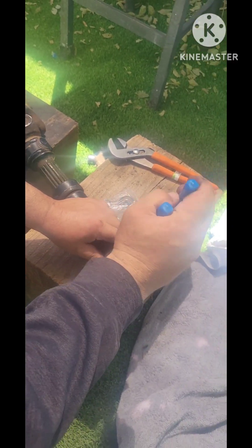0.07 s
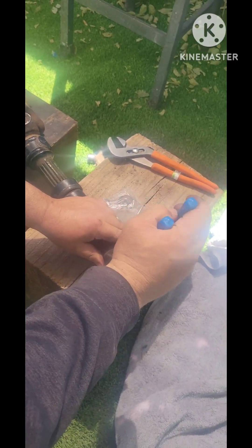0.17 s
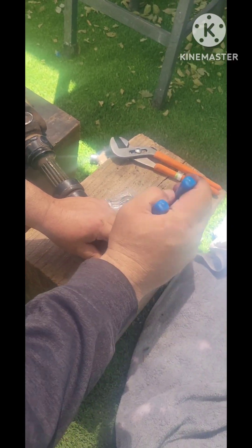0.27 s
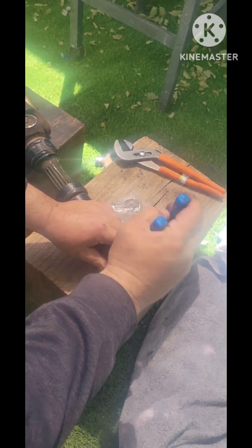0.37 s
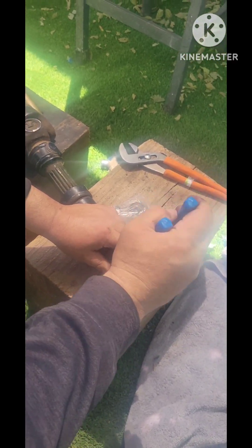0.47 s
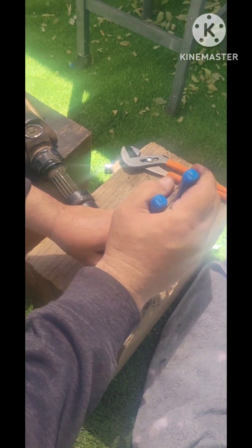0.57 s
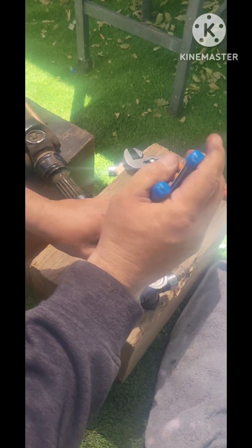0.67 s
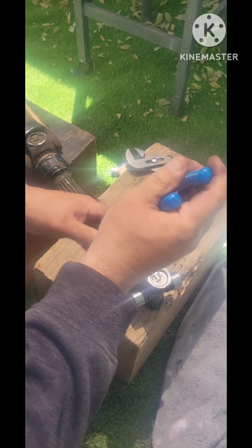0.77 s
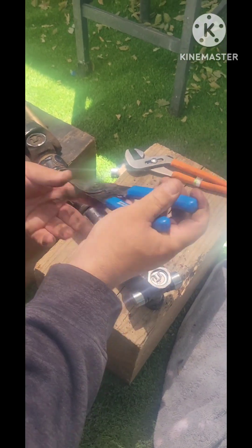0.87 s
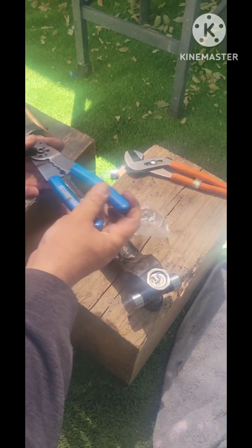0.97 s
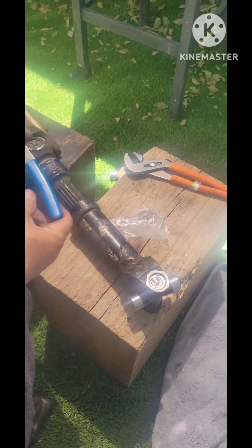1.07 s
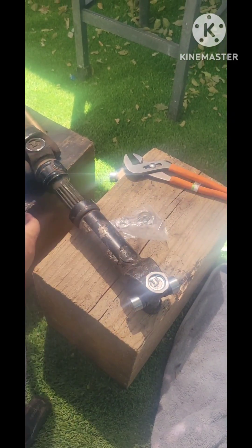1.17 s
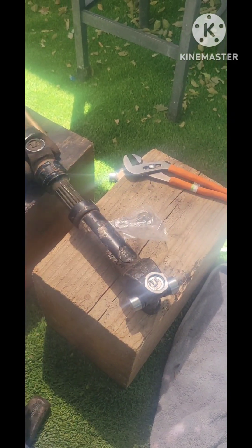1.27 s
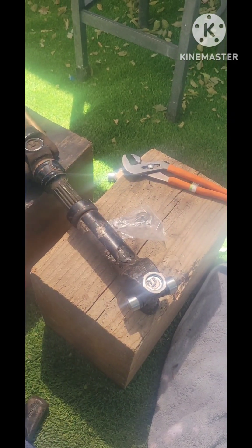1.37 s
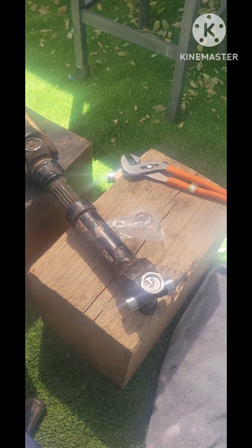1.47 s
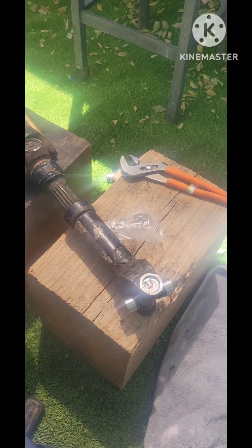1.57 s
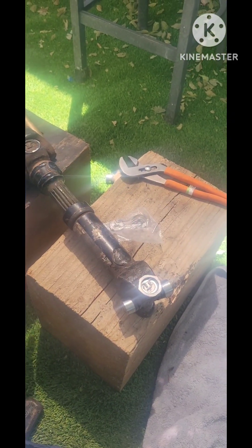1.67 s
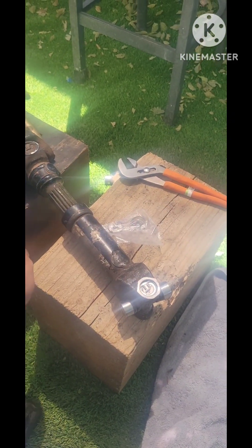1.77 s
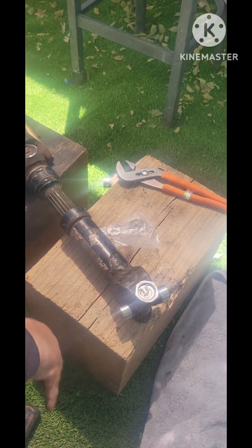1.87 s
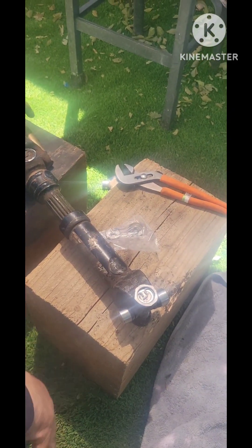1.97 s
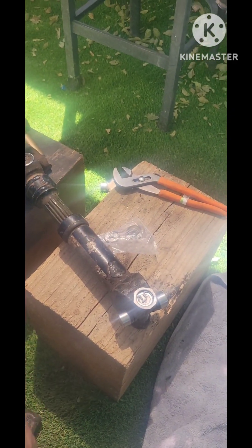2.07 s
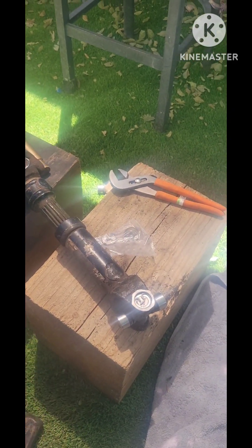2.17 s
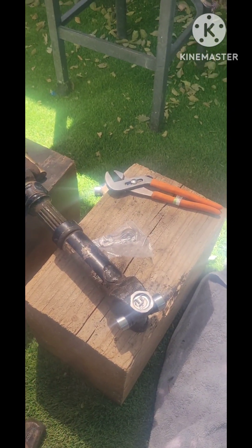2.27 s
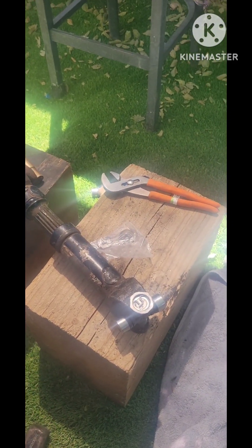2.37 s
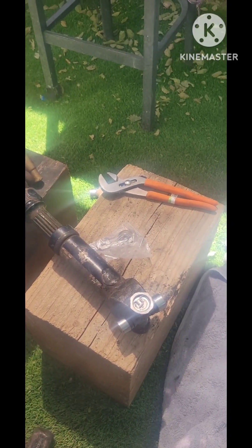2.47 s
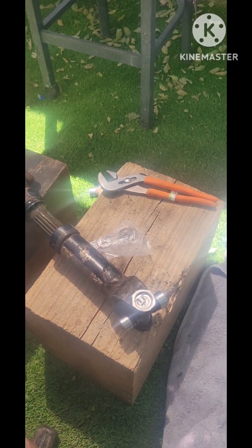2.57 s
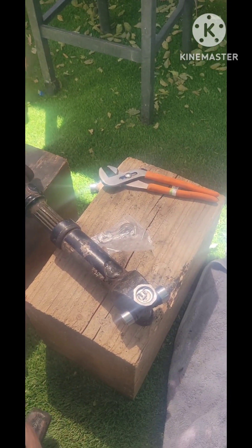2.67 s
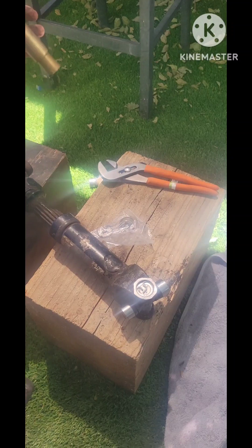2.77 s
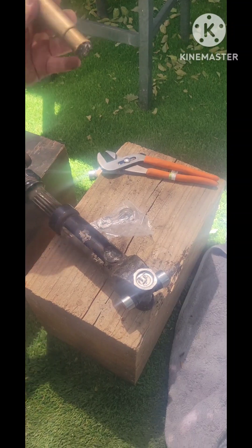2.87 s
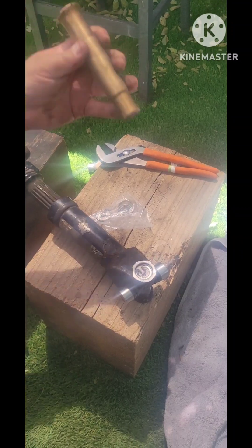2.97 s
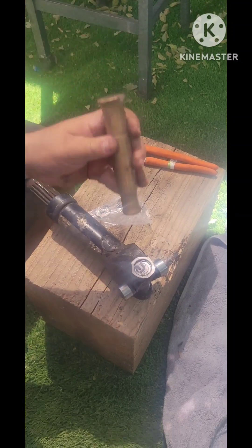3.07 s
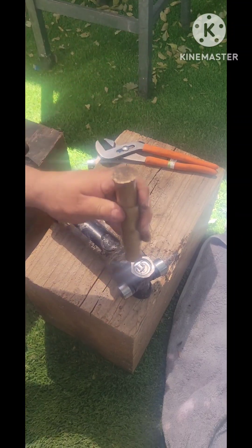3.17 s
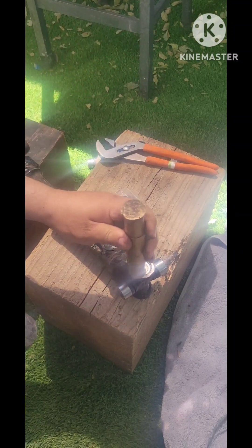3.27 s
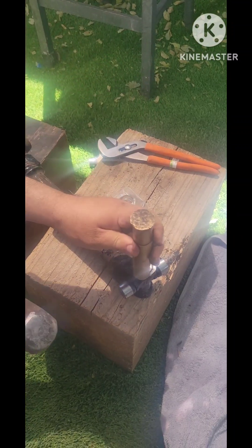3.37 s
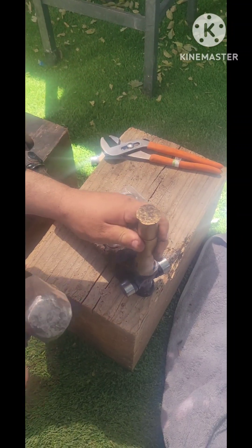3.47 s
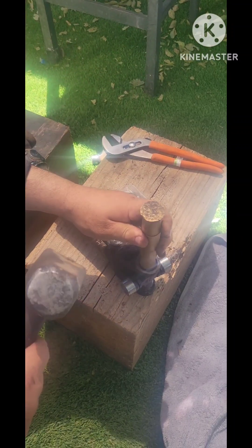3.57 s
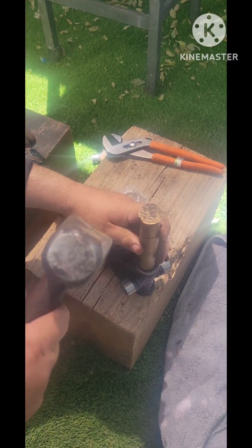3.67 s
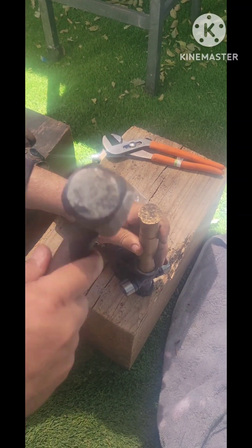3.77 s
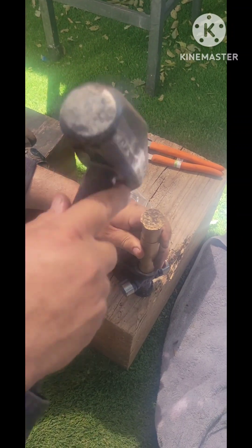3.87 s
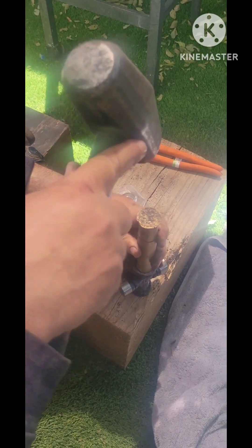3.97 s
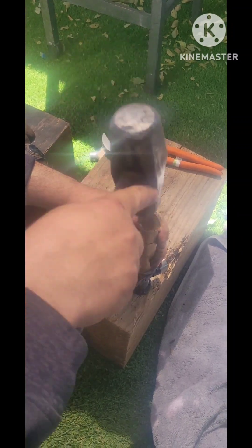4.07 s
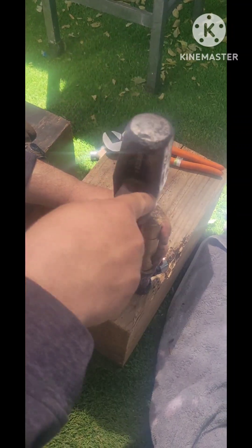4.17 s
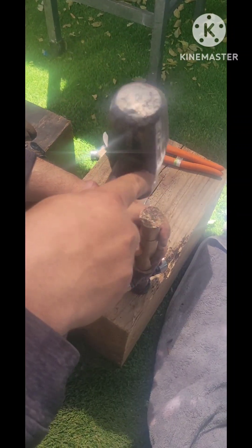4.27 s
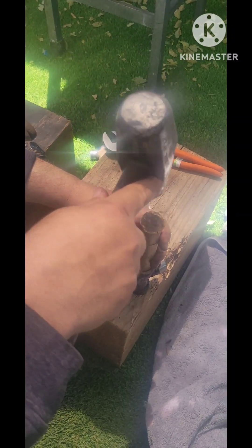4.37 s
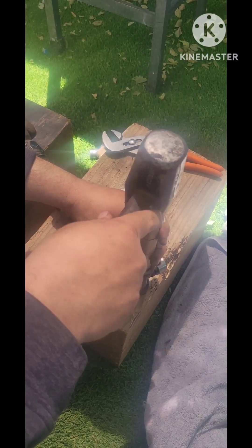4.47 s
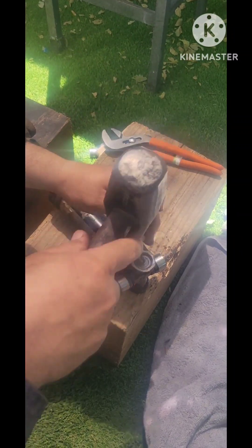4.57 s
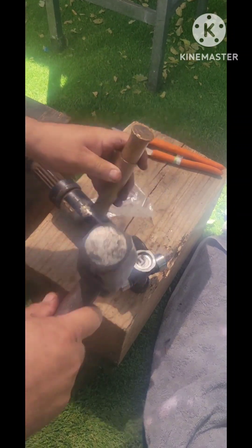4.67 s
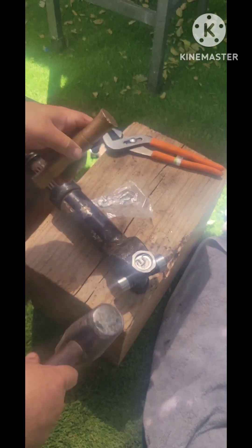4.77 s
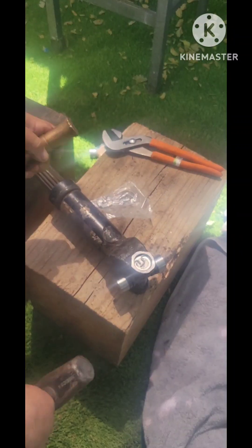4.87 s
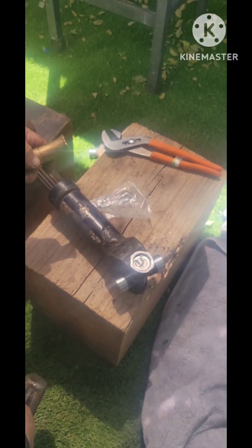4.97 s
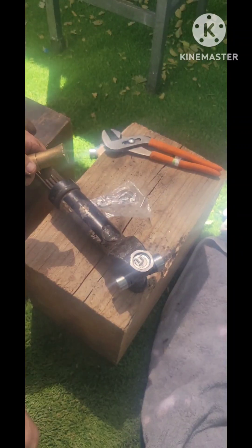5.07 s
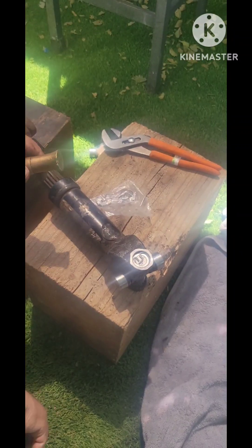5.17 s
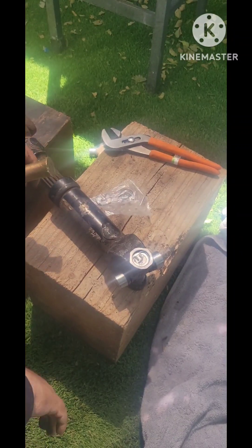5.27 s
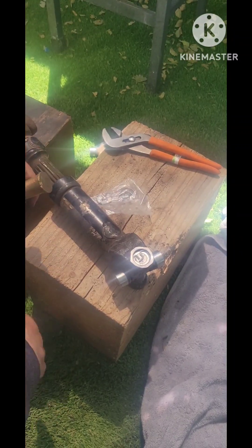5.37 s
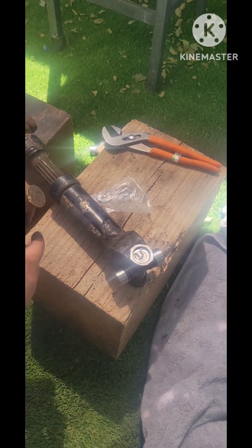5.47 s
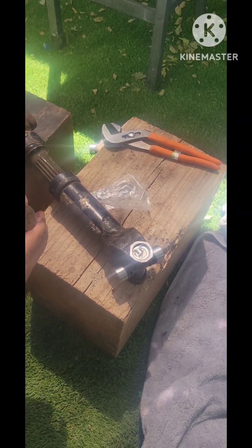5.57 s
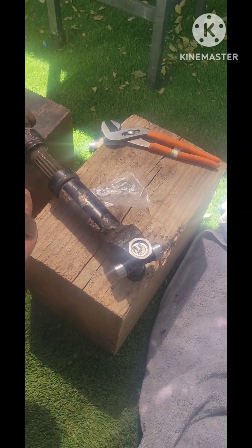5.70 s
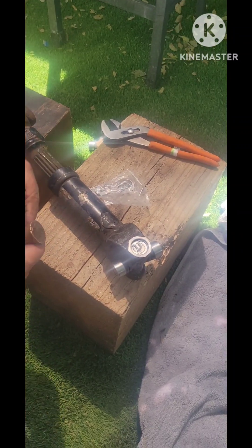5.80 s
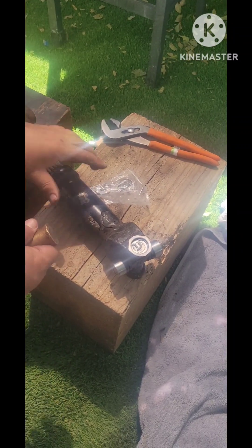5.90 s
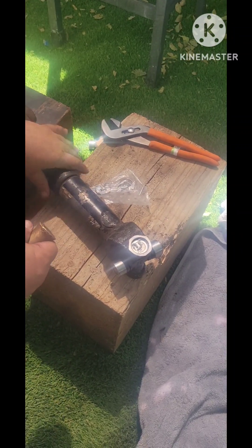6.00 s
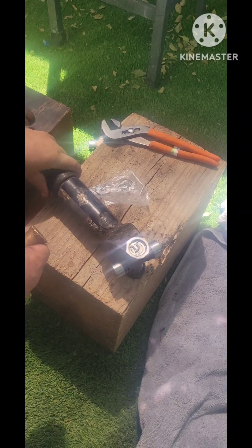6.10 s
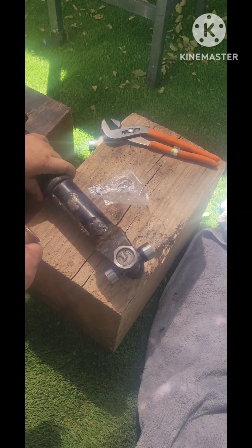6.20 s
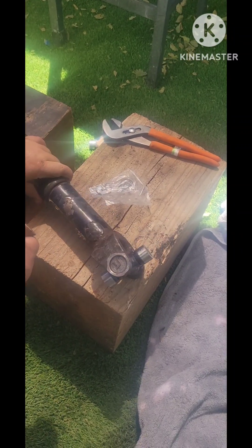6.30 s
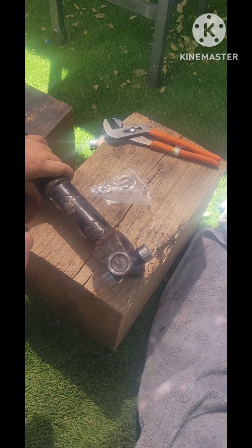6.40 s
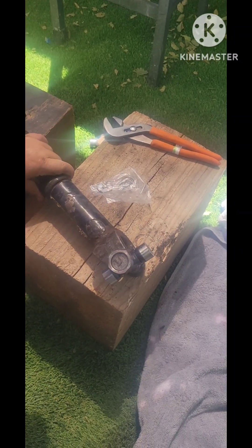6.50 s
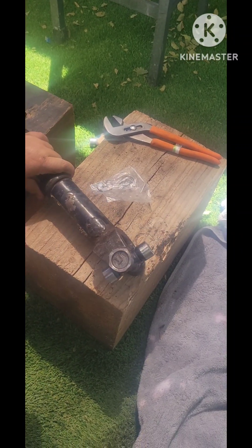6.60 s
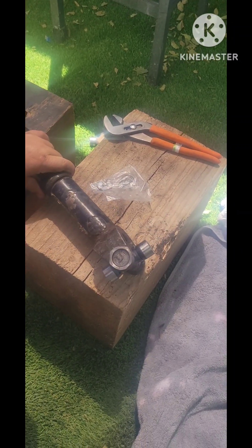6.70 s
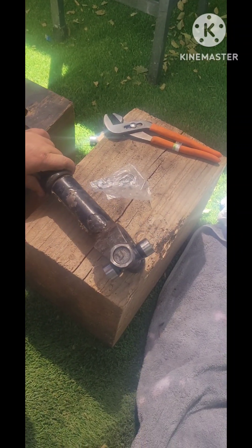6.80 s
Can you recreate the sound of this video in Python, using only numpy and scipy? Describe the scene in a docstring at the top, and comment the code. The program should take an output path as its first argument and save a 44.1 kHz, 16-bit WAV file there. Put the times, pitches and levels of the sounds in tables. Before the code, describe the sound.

Close and dry in a yard: a hand tool cracks twice on a steel joint resting on a thick wooden block, each with a short woody thud. Small metal ticks and a bump follow as a car passes behind, roaring and clattering over bumps. A metal scrape, a light tap on a punch, then two loud, bright hammer blows. Finally faint scrapes, dull bumps and a small clink, over low motor hum.

```python
"""A steel shaft joint on a wooden block is knocked twice with a hand tool; then a brass punch on it is
tapped once and struck twice with a hammer. Each hit layers a noise crack, decaying steel modes, a wooden
thud just after and a diffuse answer from the yard. Noise bursts tick, scrape and rustle in between.
Behind lie a motor hum of two sines, air noise with a faint narrow band, brief low noise swells and a
passing car: tyre roar, engine drone, exhaust boom and clatter, the first three shaped by distance."""
import sys
import numpy as np
from scipy import signal
from scipy.fft import rfft, irfft
from scipy.io import wavfile

SR = 44100
rng = np.random.default_rng(int(sys.argv[2]) if len(sys.argv) > 2 else 0)


def wav_out(sig):
    """Save sig, one row per channel (or a flat mono array), as 16-bit PCM at SR to the path in sys.argv[1]."""
    wavfile.write(sys.argv[1], SR, np.round(np.clip(np.atleast_2d(sig).T, -1, 1) * 32767).astype(np.int16))


N = 301644
TIME = np.arange(N) / SR  # seconds into the scene
AGE = np.arange(SR // 2) / SR  # seconds since a contact

# Stereo width of the coloured noise. Each row: frequency in Hz, side minus mid in dB.
WIDTH = [(60, -9.5), (110, -13), (200, -16), (380, 0.5), (700, 1), (1290, 3), (2400, 1), (8000, 0.5)]
# Colour of the still air. Each row: frequency in Hz, density in dB per Hz.
AIR_COLOUR = [(15, -33), (30, -10), (48, 0.5), (70, 1.5), (150, -5), (300, -19), (1000, -17.5),
              (2200, -31.5), (3300, -30), (4400, -39), (5600, -39.5), (8000, -47.5), (15500, -48.5)]
# Motor hum. Each row: frequency in Hz, mean level in dB rms.
HUM_TONES = [(59.8, -53), (119.7, -45.2)]
# A faint, steady narrow band of noise; the width is to each side.
FAINT_BAND_HZ, FAINT_BAND_WIDTH_HZ, FAINT_BAND_DB = 5560, 90, -90.5
# Brief swells of low noise in the background. Each row: start in seconds, level in dB, centre in Hz.
LOW_SWELLS = [(1.69, -35, 88), (1.865, -38, 95), (2.115, -36.5, 86), (2.275, -36, 218)]
LOW_SWELL_RISE_S, LOW_SWELL_T60_S = 0.021, 0.36

# The car is nearest at PASS_S, ROAD_M away; from HIDDEN_S a house shadows it more and more.
PASS_S, SPEED_M_S, ROAD_M = 1.834, 12.57, 18.3
HIDDEN_S, SHADOW_DB_PER_S = 4.3, 12.5
# What the car radiates: dB when abreast, dB more towards its front, dB less end-on, dB of far traffic.
TYRE_ROAR = (-39.5, 4.5, 5, -54.5)
ENGINE_DRONE = (-44, 11, 14, -64)
EXHAUST_BOOM = (-42.5, -2, 24.5, -67.5)
# Colour of the tyre roar. Each row: frequency in Hz, density in dB per Hz.
TYRE_COLOUR = [(100, -2.5), (300, -4), (430, -5), (560, -4.5), (740, -0.5), (920, -3), (1120, -2),
               (1500, -10), (2200, -20.5), (4000, -32), (8000, -44.5), (15000, -57)]
# Uneven swell of the roar. Each row: time in seconds, gain in dB, extra treble gain in dB.
ROAR_SWELL = [(0, 4, -6), (.35, -2.5, 5), (.55, 1.5, -5), (.75, 3, -2), (.95, 1, -0.5), (1.3, 2, -2),
              (1.85, -0.5, 0.5), (2.15, .5, 0), (2.45, 0.5, 1), (3.1, 0.5, 6), (3.6, 0, 8.5),
              (4.1, -2.5, 8), (4.85, -3, -1), (5.7, 1, -2.5), (6.7, -.5, -1.5)]
TREBLE_HZ = 1537  # where the treble of the roar begins
# Pitch of the engine drone. Each row: time in seconds, centre in Hz.
DRONE_PITCH = [(0, 201.7), (.9, 210.8), (1.4, 240.8), (1.8, 272), (2.2, 216.9), (4.9, 221.1)]
# The car clatters over bumps in the road. Each row: start in seconds, level in dB.
JOLTS = [(1.755, -41), (1.974, -34), (2.114, -32), (2.192, -30.5), (2.254, -32.5), (2.333, -31.5),
         (2.415, -39), (2.652, -41), (2.765, -41)]
# Colour of the clatter. Each row: frequency in Hz, density in dB per Hz.
CLATTER_COLOUR = [(300, -44), (500, -9), (650, 4), (830, 5.5), (960, -20), (1180, -1.5), (1500, -39),
                  (3000, -53)]
JOLT_RISE_S, JOLT_T60_S = 0.003, 0.13
# Loose parts rattle along with each jolt and last longer; the level is relative to the jolt.
RATTLE_DB, RATTLE_RISE_S, RATTLE_T60_S = -11.5, 0.011, 1.0

# The first row is the dying ring of an earlier contact; the rest are ticks of small parts.
# Each row: start in seconds, level in dB, touch t60 in seconds, ring pitch in Hz.
SMALL_CONTACTS = [(0.002, -37.5, 0.12, 2960), (.6654, -58, 0.022, 5660), (0.716, -56, .025, 6210),
                  (1.3054, -53, 0.014, 8000), (1.64, -42, 0.035, 5840), (1.647, -44, 0.048, 6240),
                  (1.677, -52, 0.015, 7050), (1.772, -43.5, 0.0073, 10200), (1.795, -48, .015, 6360),
                  (1.838, -49.5, 0.02, 6200), (1.844, -54, .012, 7500), (2.0155, -58, 0.011, 9000),
                  (3.115, -46, 0.011, 7000), (3.366, -57, 0.016, 11400), (4.744, -57, 0.025, 6950),
                  (6.383, -43.5, 0.11, 5020)]
CONTACT_RISE_S = 0.00077
# Colour of a small contact. Each row: multiple of its ring pitch, density in dB per Hz.
TOUCH_COLOUR = [(.08, 6), (.45, 7), (1, 4), (1.6, -1.5), (3, -11)]
# Modes of the shaft. Each row: frequency in Hz, level in dB, t60 in seconds, left minus right in dB.
SHAFT_MODES = [(1170, 2, .05, 0), (2440, -1, .07, 0), (3080, -4, .05, 0), (3400, -2, .05, 0),
               (3790, -1, .04, -4), (3890, 2, .04, -9), (5200, -8, .06, 0), (5400, -8, .13, 0),
               (5640, -8, .11, 0), (5900, -12, .07, 0), (7020, -7, .06, 7), (7160, -3, .06, 5)]
CLINK_S, CLINK_DB = 6.384, -48  # the shaft clinks once as it is gripped
# The shaft bumps on the wood. Each row: start in seconds, pitch in Hz, level in dB, t60 in seconds.
BUMPS = [(1.655, 560, -24.5, 0.027), (3.51, 466, -25.5, 0.014), (5.213, 177, -26, 0.03),
         (6.383, 663, -25, 0.048)]
# Metal slides over metal. Each row: start in seconds, level in dB, swell in seconds, t60 in seconds,
# upper edge of the singing in Hz, singing level in dB above the rubbing.
SCRAPES = [(2.975, -52, 0.045, 0.27, 8300, -13), (3.005, -58, 0.024, 0.17, 4350, 1),
           (3.71, -63, .026, 0.15, 6660, -18), (5.154, -55.5, 0.046, .07, 4980, -7),
           (5.198, -50.5, 0.01, 0.08, 5470, -7), (5.281, -64.5, 0.033, 0.2, 5500, -7)]
# Sleeves and hands rustle. Each row: start in seconds, level in dB, length in seconds.
RUSTLES = [(1.706, -62, .13), (2.723, -64.5, 0.26), (3.301, -76, 0.34), (3.682, -69, 0.18),
           (4.799, -71, 0.35), (5.037, -69, 0.27), (5.827, -74, .14), (6.115, -71, 0.056)]
# Colour of the cloth. Each row: frequency in Hz, density in dB per Hz.
CLOTH_COLOUR = [(800, -12), (2500, 7), (4500, -1), (7000, -4), (10000, -9), (15000, -9)]

# Modes of the punch. Each row: frequency in Hz, level in dB, t60 in seconds, left minus right in dB.
PUNCH_MODES = [(1850, -13, .012, 0), (2480, -4, .016, 4), (2640, -8, .018, 3), (2880, -7, .018, 3),
               (3380, -10, .02, 0), (3693, -.5, .066, -2), (3690, -21, .26, 0), (3770, -14, .05, -4),
               (8560, -26, .05, 0)]
# Modes of the joint and its bearing cup. Each row: frequency in Hz, level in dB in the first blow,
# level in dB in the second, t60 in seconds, left minus right in dB.
CUP_MODES = [(1176, -26, -17, .16, 0), (1230, -22, -17, .07, 2), (1400, -5, -7, .03, 3),
             (1490, -10, -35, .025, 2), (1740, -32, -3, .026, -1), (2160, -25, -36, .07, 0),
             (2380, -22, -17, .025, 2), (2580, -20, -36, .04, 4), (2704, -18, -29, .045, 5),
             (2800, -25, -22, .07, 0), (3060, -24, -18, .055, 0), (3660, -36, -25, .29, 0),
             (3730, -33, -27, .17, 0), (3880, -16, -15, .055, -7), (4043, -25, -22, .13, -3),
             (4161, -33, -32, .17, -2), (4190, -13, -13, .03, -3), (4290, -19, -22, .04, -7),
             (4850, -26, -33, .05, -2), (4990, -34, -42, .16, 0), (5227, -24, -28, .08, 0),
             (5400, -26, -40, .05, 0), (5590, -33, -31, .08, 0), (6270, -27, -34, .04, 0),
             (7130, -40, -33, .05, 0)]
# High overtones of a hard blow. Each row: frequency in Hz, level in dB in the first blow,
# level in dB in the second, t60 in seconds, left minus right in dB.
OVERTONE_MODES = [(8586, -11, -13, .12, 0), (8690, -11, -14, .12, 0), (8860, -14, -17, .1, 0),
                  (9335, -19, -19, .08, 0), (9781, -24, -18, .32, 0), (9900, -13, -14, .06, 0),
                  (10060, -18, -18, .07, 0), (11550, -20, -15, .08, 0), (12170, -13, -22, .14, 0),
                  (12620, -3, 0, .055, 0), (12780, -3, -3, .055, 0), (14050, -9, -15, .07, 0),
                  (14480, -6, -2, .06, 0), (14750, -8, -7, .06, 0)]
# Wooden block under the hammer. Each row: frequency in Hz, level in dB, t60 in seconds,
# left minus right in dB.
THUD_MODES = [(251.9, -14.5, 0.11, -0.5), (405, -17, 0.05, -0.5), (703, -12.5, 0.059, 7),
              (855, -8.5, 0.021, 0), (1076, 5, 0.0077, 1.5)]
# A light tap on the punch; the joint and thud levels are relative to it.
TAP_S, TAP_DB, TAP_JOINT_DB, TAP_THUD_DB = 3.6146, -26.5, -3, -6.5
# Colour of the tap's click. Each row: frequency in Hz, density in dB per Hz.
TAP_CLICK_COLOUR = [(300, 1), (600, 1), (1200, -5), (1800, 3), (2150, -6), (2700, 1), (3800, 1),
                    (4800, -23), (6000, -34), (15000, -46)]

# Knocks on the joint; later levels are trims within the knock. Each row: start in seconds, level in dB,
# crack in dB, steel ring in dB, rebound delay in seconds, rebound in dB, echo in dB, echo t60 in seconds.
KNOCKS = [(0.2078, -3, 4, 2.5, 0.013, -15.5, -17, 0.2), (0.4574, -0.5, -5, -0.5, 0.011, -16, -20, 0.2)]
# Modes of the joint, knocked at two spots. Each row: frequency in Hz, level in dB in the first knock,
# level in dB in the second, t60 in seconds, left minus right in dB.
JOINT_MODES = [(1260, -29, -30, .05, 0), (2350, -14, -20, .024, 4), (2417, -31, -28, .1, 7),
               (2490, -17, -14, .025, 7), (2589, -34, -30, .13, 3), (2700, -28, -12, .018, 4),
               (2790, -27, -25, .04, 4), (2950, -30, -13, .025, 6), (3020, -41, -38, .13, 2),
               (3257, -39, -35, .14, 0), (3420, -30, -25, .03, 0), (4310, -36, -24, .025, -2),
               (4640, -18, -36, .03, -4), (4800, -30, -38, .09, 0), (3750, -33, -40, .08, 0),
               (5023, -31, -42, .05, 0), (6300, -27, -42, .035, 0), (6665, -42, -42, .06, 0),
               (11310, -40, -43, .06, 0), (12530, -38, -43, .06, 0)]
# Wooden block under a knock. Each row: frequency in Hz, level in dB, t60 in seconds,
# left minus right in dB.
BLOCK_MODES = [(285.5, -31, 0.0049, 4), (508, -13.5, 0.0034, -18), (504, -33.5, 0.095, 0.5),
               (656, -4.5, 0.012, 11), (846, -10, 0.0042, -14), (1160, -28.5, 0.011, 17)]
# Colour of a knock's contact noise. Each row: frequency in Hz, density in dB per Hz.
KNOCK_CRACK_COLOUR = [(300, -49), (1000, 8.5), (1400, 13.5), (1800, -14.5), (2400, -2.5), (4500, -0.5),
                      (7000, -11.5), (10000, -13), (15000, -18.5)]
# The yard's answer to a knock. Each row: frequency in Hz, density in dB per Hz.
KNOCK_YARD_COLOUR = [(120, -43), (200, -24.5), (327, -19), (497, 18.5), (607, -5), (1150, -1), (1510, -15),
                     (1950, -22), (2420, -4), (3180, -12), (3610, -29), (5110, -26), (9480, -29),
                     (12700, -35), (15500, -47)]

# Hammer on the punch; later levels are trims within the blow. Each row: start in seconds, level in dB,
# crack in dB, punch ring in dB, overtones in dB, thud in dB, yard in dB, yard t60 in seconds,
# rebound delay in seconds, rebound in dB.
BLOWS = [(4.1829, -5.5, -0.5, -26.5, -20.5, -6, -17, .2, .012, -12),
         (4.519, -9, 4, -15.5, -17.5, 0.5, -17.5, .17, .0102, -15.5)]
# Colour of the hammer's contact noise. Each row: frequency in Hz, density in dB per Hz in the first blow,
# density in dB per Hz in the second.
BLOW_CRACK_COLOUR = [(298.4, -33, -34.5), (901.4, 8, 12), (1546, 4.5, -2), (1970, -5.5, -1.5),
                     (3000, -3.5, -5.5), (4040, -2, -1), (5060, 1.5, -11), (6200, -24, -14),
                     (8880, -15, -21.5), (11020, -32.5, -41.5), (14500, -32, -20), (15800, -28, -30.5)]
# The yard's answer to a blow. Each row: frequency in Hz, density in dB per Hz.
BLOW_YARD_COLOUR = [(120, -14), (270, -7), (520, -4.5), (750, -13.5), (1150, -4), (1750, -21), (2100, -14),
                    (3000, -12), (4000, -11.5), (5000, -16), (6100, -25.5), (8800, -24.5), (10600, -50),
                    (13000, -31.5), (15500, -49)]
TOP_HZ = 15800  # upper limit of the recorder


def undb(db):
    """Decibels to gain."""
    return 10 ** (np.asarray(db) / 20)


def panned(db):
    """Stereo gains for a left minus right difference in dB."""
    return undb(np.array([[db], [-db]]) / 2)


def lowpass(x, hz):
    """Third-order lowpass run both ways, so the remainder stays in phase."""
    return signal.sosfiltfilt(signal.butter(3, hz, fs=SR, output="sos"), x)


def curve(rows):
    """The columns of a table, joined by straight lines in time."""
    seconds, *columns = np.transpose(rows)
    return [np.interp(TIME, seconds, column) for column in columns]


def walk(rate):
    """Smooth chance with unit spread, changing about rate times a second."""
    f = np.fft.rfftfreq(N, 1 / SR)
    x = irfft(rfft(rng.standard_normal(N)) / (1 + (f / rate) ** 4), N)
    return x / x.std()


def colour_db(table, size):
    """A table's levels, joined by straight lines over log frequency."""
    hz, db = np.transpose(table)
    return np.interp(np.log(np.fft.rfftfreq(size, 1 / SR) + 1), np.log(hz), db)


def noise(spectrum, size):
    """Stereo noise of unit rms with the given colour; the microphones share most of the bass."""
    gain = undb(colour_db(spectrum, size))
    side = undb(colour_db(WIDTH, size))
    mid_noise, side_noise = rfft(rng.standard_normal((2, size)))
    stereo = np.array([mid_noise + side * side_noise, mid_noise - side * side_noise])
    x = irfft(stereo * gain / np.hypot(1, side), size)
    return x / x.std()


def narrow(hz, width_hz):
    """A narrow band of noise of unit rms around a steady or moving pitch."""
    turn = 2 * np.pi * np.cumsum(hz * np.ones(N)) / SR
    return walk(width_hz) * np.cos(turn) + walk(width_hz) * np.sin(turn)


def fade(rise, t60):
    """A quick swell, then an exponential decay."""
    return np.minimum(AGE / rise, 1) * np.exp(-np.log(1000) * np.maximum(AGE - rise, 0) / t60)


def burst(spectrum, db, rise, t60):
    """Coloured noise that swells and dies."""
    return undb(db) * fade(rise, t60) * noise(spectrum, len(AGE))


def ring(modes, rise, lag_ms):
    """Decaying sine modes whose waves lag by lag_ms on the left; both sides share the swell and decay."""
    t = AGE - np.array([[lag_ms / 1000], [0]])
    out = 0
    for hz, db, t60, pan_db in modes:
        out = out + undb(db) * panned(pan_db) * fade(rise, t60) * np.sin(2 * np.pi * hz * t)
    return out


def at_hit(table, index, count=2):
    """A table as one hit of a pair excites it: the frequency, that hit's level, then the shared columns."""
    return [(row[0], row[1 + index], *row[1 + count:]) for row in table]


def add(out, s, sound):
    """Mix a sound in at time s."""
    i = max(int(s * SR), 0)
    out[:, i:i + sound.shape[1]] += sound[:, :out.shape[1] - i]


def diffuse(sound, db, tail):
    """Smear a sound through a noise tail of unit energy per channel on average."""
    tail = tail / np.sqrt(np.sum(tail ** 2) / 2)
    return undb(db) * signal.fftconvolve(sound, tail, axes=1)[:, :len(AGE)]


def echoes(sound, db, t60):
    """Surroundings scatter a sound into a short diffuse tail, different at each microphone."""
    return diffuse(sound, db, rng.standard_normal((2, len(AGE))) * fade(0.008, t60))


def scattered(sound, db, t60, rise=0.014, clump_db=2.0, rate=120):
    """Reflections come back in clumps, so the tail dies unevenly and keeps the colour of the sound."""
    clumps = undb(clump_db * walk(rate)[:len(AGE)])
    return diffuse(sound, db, rng.standard_normal((2, len(AGE))) * fade(rise, t60) * clumps)


def flicker(x, depth_db, rate, lowest_hz=230, count=4):
    """The lowest band and the octaves above it swell and sink on their own; the rest stays steady."""
    out, rest = 0, x
    for k in range(count):
        band = lowpass(rest, lowest_hz * 2 ** k)
        out = out + band * undb(depth_db * walk(rate))
        rest = rest - band
    return out + rest


def grainy(sound, depth_db, rate):
    """Surfaces stick and slip, so rubbing comes in uneven grains."""
    grip = undb(depth_db * walk(rate)[:len(AGE)])
    return sound * grip / np.sqrt(np.mean(grip ** 2))


def touch_noise(db, rise, t60, hz):
    """Small metal surfaces meet: noise whose colour scales with their ring pitch."""
    return burst([(hz * k, level) for k, level in TOUCH_COLOUR], db, rise, t60)


def contact(db, rise, t60, hz, ring_db=-8, ring_stretch=1.6):
    """Small metal parts touch: a burst of contact noise and a longer ring of banded noise."""
    ring_colour = [(hz * 0.99, -40), (hz, 0), (hz * 2.5, -40)]
    metal = burst(ring_colour, db + ring_db, rise, t60 * ring_stretch)
    return touch_noise(db, rise, t60, hz) + metal


def air():
    """The still air of the yard as soft coloured noise, with a faint, steady narrow band near 5.6 kHz."""
    faint_band = undb(FAINT_BAND_DB) * narrow(FAINT_BAND_HZ, FAINT_BAND_WIDTH_HZ)
    return undb(-52.0) * noise(AIR_COLOUR, N) + faint_band


def hum(waver_db=2.0):
    """Motor hum of two sines, each wavering in level, with a common drift in phase."""
    drift = 0.25 * walk(1.5)  # radians
    tones = 0
    for k, (hz, db) in enumerate(HUM_TONES):
        level = np.sqrt(2) * undb(db + waver_db * walk(10.0))
        tones = tones + level * np.sin(2 * np.pi * hz * TIME + (k + 1) * drift)
    return tones


def low_swells():
    """Brief swells of low noise in the background, each a band that rises fast and dies slowly."""
    out = np.zeros((2, N))
    for s, db, hz in LOW_SWELLS:
        colour = [(hz / 2, -45), (hz, 0), (hz * 2, -45), (hz * 10, -90)]
        add(out, s, burst(colour, db, LOW_SWELL_RISE_S, LOW_SWELL_T60_S))
    return out


def passing(db, front_db, end_on_db, far_db):
    """Gain of one car sound from its distance, heading and the house's shadow, over far traffic."""
    to_go = SPEED_M_S * (PASS_S - TIME)
    distance = np.hypot(to_go, ROAD_M)
    facing = to_go / distance  # 1 coming head on, -1 driving away
    shadow_db = SHADOW_DB_PER_S * np.maximum(TIME - HIDDEN_S, 0)
    car = undb(db + front_db * facing - end_on_db * facing ** 2 - shadow_db) * ROAD_M / distance
    return np.hypot(car, undb(far_db))


def traffic(drone_width_hz=50, boom_hz=88, boom_width_hz=19, flutter_db=0.8, drone_pan_db=-4.5, surge_db=2.15):
    """A car passes: tyre noise roars; noise bands make the uneven drone and the boom, loudest near abreast."""
    drone_hz, = curve(DRONE_PITCH)
    swell_db, treble_db = curve(ROAR_SWELL)
    roar = flicker(noise(TYRE_COLOUR, N), depth_db=2.0, rate=12)
    low = lowpass(roar, TREBLE_HZ)
    tyres = low + undb(treble_db) * (roar - low)
    tyres = tyres * passing(*TYRE_ROAR) * undb(swell_db + flutter_db * walk(6.1))
    drone = narrow(drone_hz, drone_width_hz) * passing(*ENGINE_DRONE)
    boom = narrow(boom_hz, boom_width_hz) * passing(*EXHAUST_BOOM)
    surge = undb(surge_db * walk(2.8))
    return tyres + surge * (drone * panned(drone_pan_db) + boom)


def clatter():
    """Hollow, far-off knocks from the car as noise bursts, each with a softer, longer rattle."""
    out = np.zeros((2, N))
    for s, db in JOLTS:
        jolt = burst(CLATTER_COLOUR, db, JOLT_RISE_S, JOLT_T60_S)
        rattle = burst(CLATTER_COLOUR, db + RATTLE_DB, RATTLE_RISE_S, RATTLE_T60_S)
        add(out, s, jolt + rattle)
    return out


def rubbing():
    """Metal scrapes over metal in grains and sings in a narrow band; cloth rustles in soft arches."""
    out = np.zeros((2, N))
    for s, db, rise, t60, hz, ring_db in SCRAPES:
        rub = touch_noise(db, rise, t60, hz)
        # the singing climbs to a peak just below hz and stops sharply there
        sing_colour = [(hz * 0.9, -50), (hz * 0.98, -9.58), (hz * 0.98001, -50)]
        sing = burst(sing_colour, db + ring_db, rise, t60)
        add(out, s, grainy(rub, depth_db=4, rate=220) + sing)
    for s, db, length in RUSTLES:
        arch = np.sin(np.pi * np.minimum(AGE / length, 1))
        cloth = undb(db) * arch * noise(CLOTH_COLOUR, len(AGE))
        add(out, s, grainy(cloth, depth_db=2.5, rate=90))
    return out


def handling():
    """A dying ring and ticks as noise bursts; the shaft clinks in its modes and bumps dully on the wood."""
    out = np.zeros((2, N))
    for s, db, t60, hz in SMALL_CONTACTS:
        add(out, s, contact(db, CONTACT_RISE_S, t60, hz))
    shaft = ring(SHAFT_MODES, CONTACT_RISE_S, lag_ms=0.05)
    add(out, CLINK_S, undb(CLINK_DB) * (shaft + echoes(shaft, -7, t60=0.13)))
    for s, hz, db, t60 in BUMPS:
        dull_colour = [(hz / 2, -12), (hz, 0), (hz * 2, -14), (hz * 10, -60)]
        dull = burst(dull_colour, db - 20.5, rise=0.0043, t60=0.011)
        add(out, s, ring([(hz, db, t60, 0)], rise=0.00059, lag_ms=0.46) + dull)
    return out


def tap(soft_hz=2500, give_s=0.0038):
    """A light tap clicks and rings the punch; the soft contact wakes mostly the lower modes of the joint."""
    out = np.zeros((2, N))
    joint = undb(TAP_JOINT_DB) * ring(at_hit(CUP_MODES, index=1), rise=0.00063, lag_ms=0.095)
    body = signal.sosfilt(signal.butter(3, soft_hz, fs=SR, output="sos"), joint)
    click = burst(TAP_CLICK_COLOUR, -0.92, rise=0.00075, t60=0.015)
    sound = ring(PUNCH_MODES, rise=0.00103, lag_ms=0.036) + body + click
    add(out, TAP_S, undb(TAP_DB) * (sound + echoes(sound, -16, t60=0.2)))
    thud = ring(THUD_MODES, rise=0.00048, lag_ms=0.044)
    add(out, TAP_S + give_s, undb(TAP_DB + TAP_THUD_DB) * thud)
    return out


def knocks(give_s=0.00283, echo_s=0.00422, echo_db=-4):
    """Steel cracks and rings first; the block gives a moment later and the ground echoes its thud."""
    out = np.zeros((2, N))
    wood = ring(BLOCK_MODES, rise=0.00108, lag_ms=0.069)
    for k, row in enumerate(KNOCKS):
        s, db, crack_db, ring_db, rebound_s, rebound_db, wall_db, wall_t60 = row
        crack = burst(KNOCK_CRACK_COLOUR, -9.5 + crack_db, rise=0.00023, t60=0.019)
        steel = undb(ring_db) * ring(at_hit(JOINT_MODES, index=k), rise=0.0011, lag_ms=0.11)
        yard = burst(KNOCK_YARD_COLOUR, -21.5, rise=0.015, t60=0.14)
        yard = yard + echoes(crack + steel, wall_db, t60=wall_t60)
        add(out, s, undb(db) * (crack + steel + yard))
        add(out, s + rebound_s, undb(db + rebound_db) * crack)
        add(out, s + give_s, undb(db) * wood)
        add(out, s + give_s + echo_s, undb(db + echo_db) * wood)
    return out


def hammer(give_s=0.0036):
    """Each blow wakes its own mix of modes, thuds into the block and rebounds once; the yard answers."""
    out = np.zeros((2, N))
    punch = ring(PUNCH_MODES, rise=0.00084, lag_ms=0.05)
    wood = ring(THUD_MODES, rise=0.00077, lag_ms=0.022)
    for k, row in enumerate(BLOWS):
        s, db, crack_db, punch_db, overtone_db, thud_db, yard_db, yard_t60, rebound_s, rebound_db = row
        cup = ring(at_hit(CUP_MODES, index=k), rise=0.0022, lag_ms=0.068)
        steel = undb(punch_db) * punch + cup
        overtones = ring(at_hit(OVERTONE_MODES, index=k), rise=0.0029, lag_ms=0.028)
        bright = undb(overtone_db) * (overtones + echoes(overtones, -8.5, t60=0.1))
        impact = burst(at_hit(BLOW_CRACK_COLOUR, index=k), crack_db, rise=0.00225, t60=0.012)
        add(impact, give_s, undb(thud_db) * wood)  # the impact now holds crack and thud
        clang = burst(BLOW_YARD_COLOUR, 7, rise=0.001, t60=0.035)
        yard = scattered(clang, yard_db, yard_t60) + echoes(steel, -13.5, t60=0.2)
        add(out, s, undb(db) * (impact + steel + bright + yard))
        add(out, s + rebound_s, undb(db + rebound_db) * impact)
    return out


def scene():
    """Air, hum and road behind, tools in front."""
    background = air() + hum() + low_swells() + traffic() + clatter()
    return background + rubbing() + handling() + tap() + knocks() + hammer()


def record(dry, low_cut_hz=36):
    """The microphone loses the deepest bass; the recorder rounds the sharpest peaks and cuts the top."""
    thin = signal.sosfilt(signal.butter(3, low_cut_hz, "high", fs=SR, output="sos"), dry)
    rounded = thin / (1 + thin ** 4) ** (1 / 4)
    return signal.sosfilt(signal.ellip(8, 0.2, 70, TOP_HZ, fs=SR, output="sos"), rounded)


dry = scene()
out = record(dry)
wav_out(out)
```